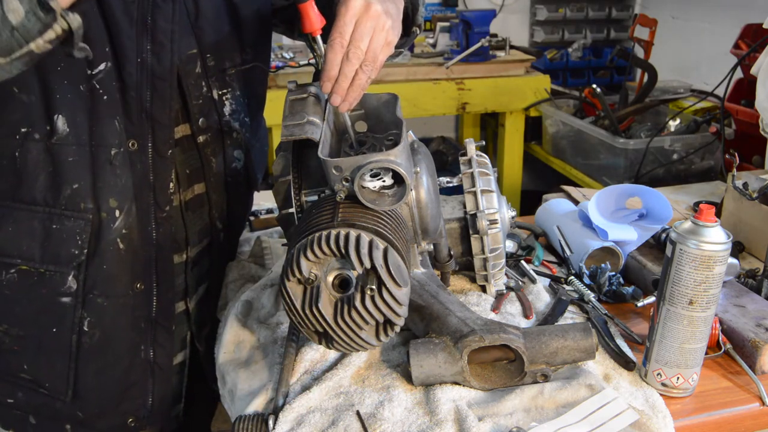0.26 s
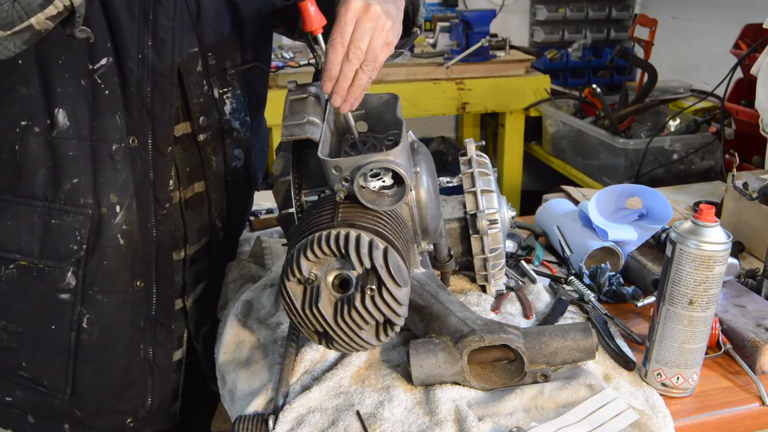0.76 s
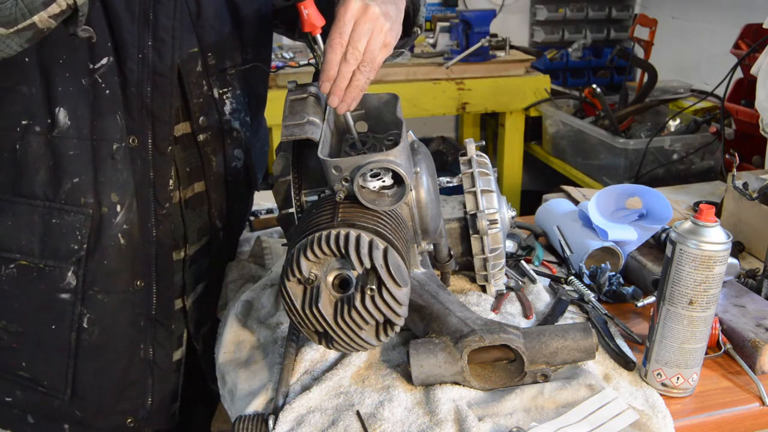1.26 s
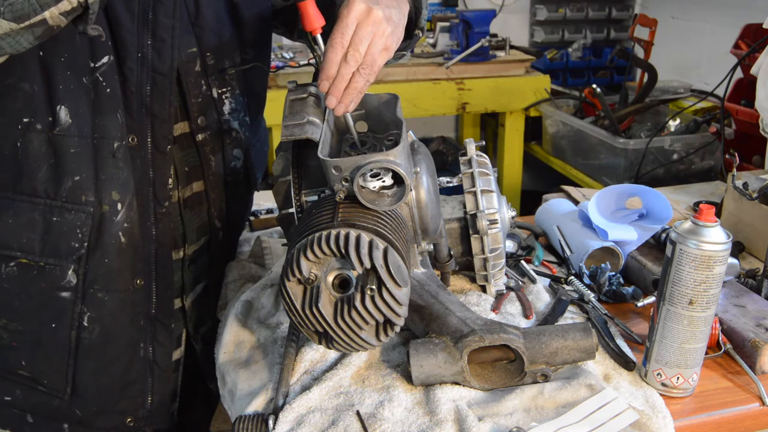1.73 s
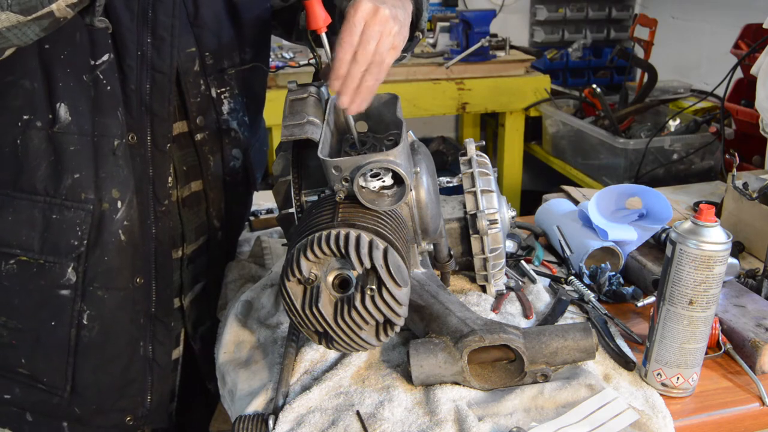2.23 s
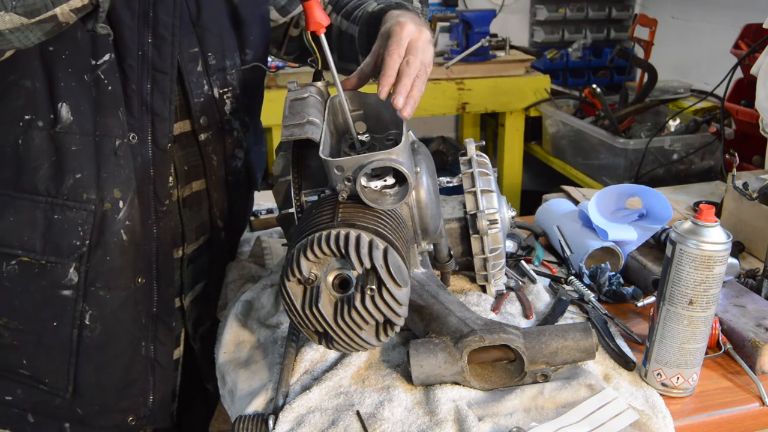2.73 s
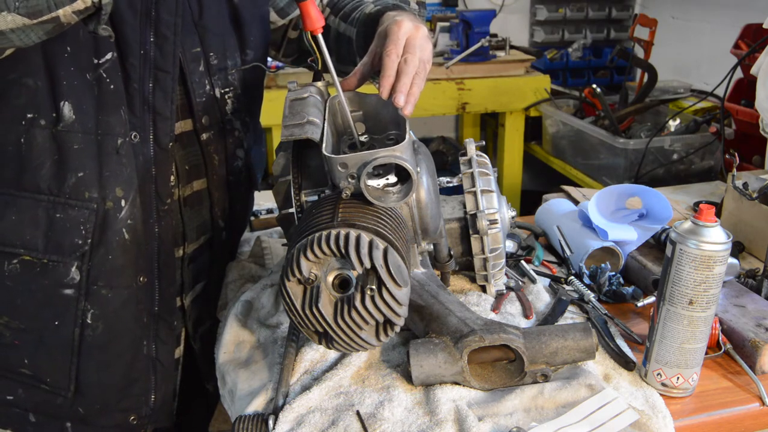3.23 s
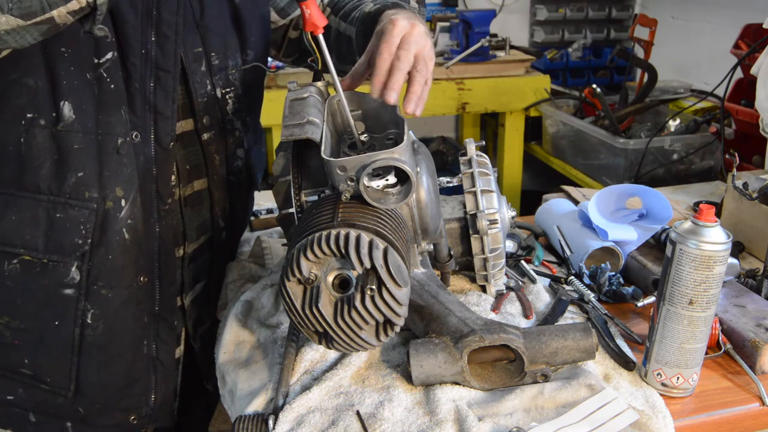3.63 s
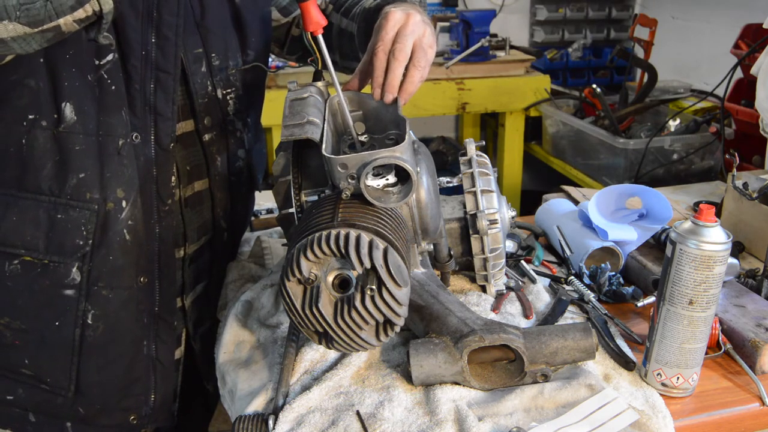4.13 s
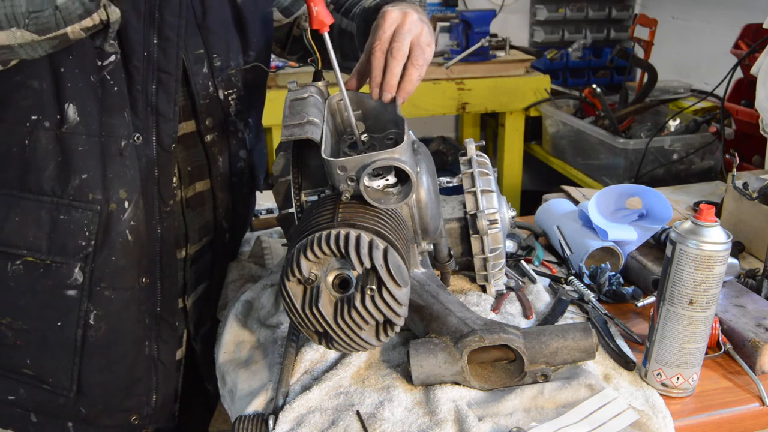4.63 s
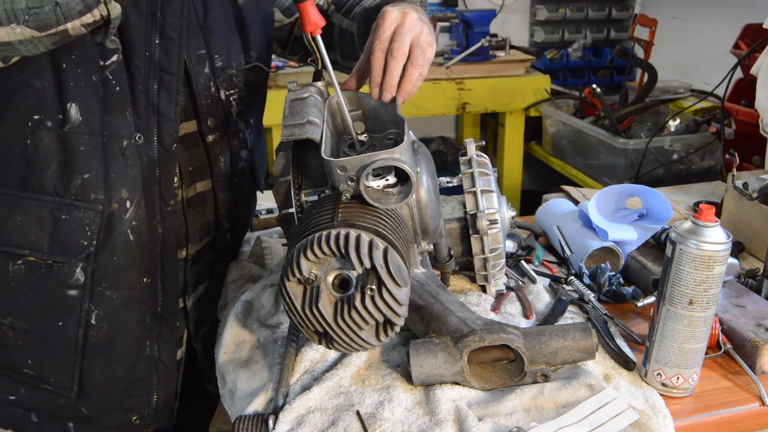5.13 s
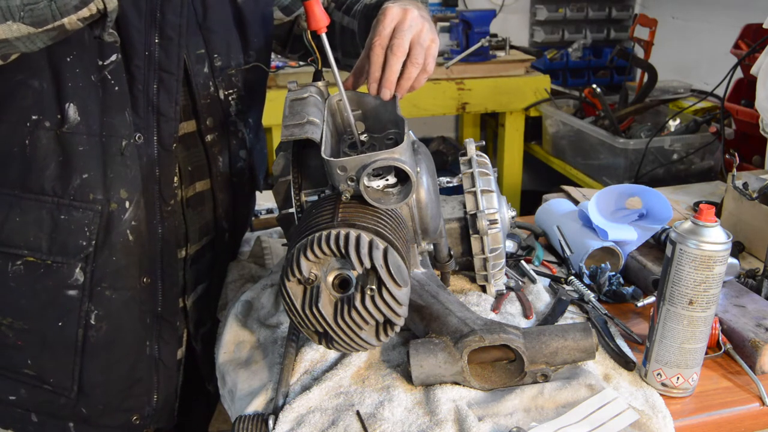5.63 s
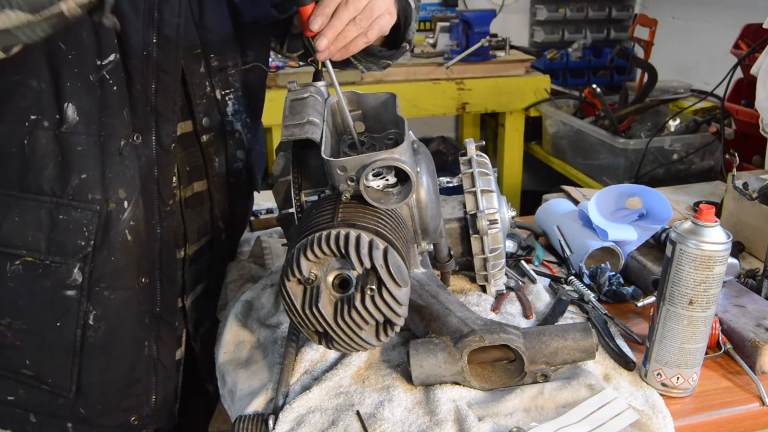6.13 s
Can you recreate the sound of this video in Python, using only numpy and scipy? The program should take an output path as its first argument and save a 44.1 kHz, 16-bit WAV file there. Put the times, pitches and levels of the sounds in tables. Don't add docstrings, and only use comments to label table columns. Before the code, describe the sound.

In a quiet workshop, a screwdriver ticks and squeaks faintly in a small metal engine casing, with one loud ringing clank midway over soft hiss.

```python
import sys
import numpy as np
from scipy import signal
from scipy.fft import rfft, irfft, next_fast_len
from scipy.io import wavfile
from scipy.ndimage import uniform_filter1d, map_coordinates

SR = 44100
rng = np.random.default_rng(int(sys.argv[2]) if len(sys.argv) > 2 else 0)


def store_pcm(level_fs):
    pcm = np.round(np.clip(level_fs, -1, 1) * 32767).astype(np.int16)
    wavfile.write(sys.argv[1], SR, np.atleast_2d(pcm).T)


def boost(x):
    u = np.asarray(x, float) / 20
    return 10 ** u


N = 280917


def add(out, s, sound):
    i = int(s * SR)
    out[i:i + len(sound)] += sound[:N - i]


def strike(table, modes, minor_db, count):
    out = np.zeros(N)
    strong = np.transpose(modes)
    lowest, highest = np.log(strong[0, 1]), np.log(strong[0, -2])
    minor_hz = np.exp(rng.uniform(lowest, highest, size=count))
    minor_level = minor_db + 3 * rng.standard_normal(size=count)
    minor_t60 = 0.19 * rng.uniform(0.45, 0.46, size=count)
    hz, db, t60 = np.hstack([strong, [minor_hz, minor_level, minor_t60]])[:, :, None]
    rattle, rattle_hz, crack_t60_s = .45, 105, .019
    for s, peak_db, centre_hz, octaves, crack_db, held_s in table:
        t = np.arange(int(min(1.7 * held_s + .012, .25) * SR)) / SR
        detune = 1 + .002 * rng.standard_normal(hz.shape)
        start = rng.uniform(0, 2 * np.pi, hz.shape)
        reach = boost(db) * np.exp(-.5 * (np.log2(hz / centre_hz) / octaves) ** 2)
        loose = rng.standard_normal((2, len(hz), 64))
        push = [np.array([np.interp(t * rattle_hz, np.arange(64), row) for row in part]) for part in loose]
        ring = boost(-60 * t / t60 - 6 * (t / held_s) ** 4)
        ring = ring * (1 + rattle * (push[0] + 1j * push[1]))
        crack = boost(crack_db - 60 * t / crack_t60_s)
        swing = np.exp(1j * (2 * np.pi * hz * detune * t + start))
        blow = np.real(reach * (ring + crack) * swing).sum(axis=0)
        blow = blow * np.sin(np.pi / 2 * np.minimum(t / 0.0017, 1)) ** 2
        add(out, s, boost(peak_db) * blow / np.abs(blow).max())
    return out


def blows(table, crack_db, crack_per_db):
    return [(s, db, hz, octaves, crack_db + crack_per_db * (db + 20), held_s)
            for s, db, hz, octaves, held_s in table]


# mode in Hz, level in dB, t60 in seconds.
RIM_MODES = [(179.2, -11, 0.16), (398, -20, 0.011), (630, -17.5, 0.035), (780, -8, 0.096), (883, -10, 0.29),
             (1020, -17.5, 0.97), (1142, -11, 0.97), (1308, -4, 0.46), (1430, -10.5, 0.16),
             (1590, -19.5, 0.53), (1667, -7.5, 0.14), (1950, -9, 0.087), (2076, -6.5, 0.506),
             (2210, -7.5, .15), (2050, -8.5, 0.061), (2467, -1, 0.054), (2490, -10.5, 0.31),
             (3315, -2.5, 0.052), (3900, -17.5, 0.49), (3700, -12, 0.19), (3940, -20, 0.201),
             (4190, -4, 0.073), (4600, -24, 0.098), (4780, -20, 0.35), (5300, -32, 0.64), (6290, -48, .1),
             (6900, -10, 0.064)]
# start in seconds, peak in dB, centre in Hz, width in octaves, seconds until the hand damps it.
RIM_KNOCKS = [
    (2.493, -13, 2700, 0.86, .11),
    (2.502, -34, 5130, 0.12, 0.067),
    (2.511, -28.5, 2076, .08, 0.1),
    (2.512, -23, 650, .6, .08),
]


def rim_knocks():
    return strike(blows(RIM_KNOCKS, 10.9, .01), RIM_MODES, minor_db=-21, count=70)


# mode in Hz, level in dB, t60 in seconds.
BORE_MODES = [(610, 4.5, 0.42), (870, -6, 0.32), (1014, -5, 0.72), (1125, 10, 0.41), (1260, 3.5, 0.71),
              (1700, -20, 0.095), (1734, 10, 0.29), (2250, 13.5, 0.042), (2343, 4, 0.11), (2230, -28, .4),
              (2590, -3, 0.097), (2690, -2.5, 0.046), (3360, -47, 0.14), (4010, -10, 0.12),
              (5000, -18, .04), (6000, -20, .03)]
# start in seconds, peak in dB, centre in Hz, width in octaves, seconds until the hand damps it.
BORE_KNOCKS = [
    (3.473, -20, 2400, 1, .014),
    (3.482, -30, 1760, .5, .008),
    (3.495, -47, 1600, .7, .09),
    (3.515, -40, 1200, .5, .05),
]


def bore_knocks():
    return strike(blows(BORE_KNOCKS, 11, .6), BORE_MODES, minor_db=-22, count=30)


# mode in Hz, level in dB, t60 in seconds.
SHANK_MODES = [(1057, -2.5, 0.39), (1376, 4, 0.11), (1577, -9.5, 0.33), (1790, 0, 0.073), (2020, -8, 0.11),
               (2394, 11.5, 0.082), (2470, -40, 0.24), (3325, 0, 0.051), (3560, -12, 0.04),
               (5000, -25, 0.026)]
# start in seconds, peak in dB, centre in Hz, width in octaves, crack over ring in dB.
SHANK_KNOCKS = [
    (.245, -29, 2160, 3.5, -18),
    (0.665, -29, 2600, 0.61, 19),
    (0.675, -47, 1710, 0.14, -6),
    (.912, -30.5, 2240, 1.8, -1),
]


def shank_knocks():
    return strike([(*row, .028) for row in SHANK_KNOCKS], SHANK_MODES, minor_db=-10, count=12)


# mode in Hz, level in dB, t60 in seconds.
SLOT_MODES = [(877, 18, 0.38), (1230, 8, 0.27), (1577, -3.5, 0.58), (1730, 4.5, 0.089), (2078, -3.5, 0.21),
              (2370, 0.5, .05), (3000, -9, 0.047), (3200, 0.5, 0.042), (3564, 5.5, 0.03),
              (4170, -2.5, 0.095), (5080, 7, 0.013), (5300, -9, 0.076), (5650, -10, 0.011),
              (6720, 4, 0.014), (7210, -4, 0.019), (7580, -5, 0.035), (8470, -4.5, 0.02),
              (9120, -15, 0.044), (10270, -23, 0.057), (11400, -6, 0.022)]
# start in seconds, peak in dB, centre in Hz, width in octaves.
TICKS = [(.213, -43, 1830, 0.33), (0.727, -52, 4130, 0.099), (2.754, -59, 1800, .34),
         (2.956, -54, 1730, 0.2), (2.957, -50.5, 6000, 1), (3.097, -58, 1500, .5), (3.183, -51, 2300, 0.5),
         (3.366, -48.5, 7350, 0.21), (3.366, -48, 3840, 0.85), (3.376, -47.5, 3030, 0.23),
         (3.694, -47.5, 7200, .14), (3.695, -47.5, 3450, 0.35), (3.75, -48.5, 1810, 0.44),
         (3.796, -41, 9000, .2), (3.8, -48.5, 2700, 0.67), (3.909, -51, 3060, 0.81),
         (3.985, -50.5, 5000, 1), (4.262, -49, 5080, 0.19), (4.265, -55.5, 2470, 0.57),
         (4.442, -52.5, 2250, .15), (4.808, -49, 6900, 0.08), (4.811, -45, 4130, 1),
         (5.12, -61, 2380, 0.28), (5.387, -54, 1730, 0.33), (5.411, -46, 9800, .18),
         (5.411, -39.5, 1740, 0.29), (5.425, -41, 1890, 0.19), (5.68, -44, 7400, 0.18),
         (6.34, -57, 1840, 0.59)]
# start in seconds, peak in dB, mode in Hz, seconds until damped.
PINGS = [(.215, -44.5, 1577, .041), (.216, -46, 2078, 0.037), (0.577, -53, 7700, 0.034),
         (0.91, -47.5, 5000, .015), (3.19, -54, 4170, .026), (3.694, -42, 5040, 0.052),
         (3.765, -56, 5650, .03), (3.796, -43.5, 5650, 0.024), (3.86, -65, 4170, .06),
         (4.878, -62, 6720, 0.018), (5.385, -44.5, 5080, 0.042), (5.386, -58, 7260, .02),
         (5.414, -56, 7580, .03), (5.411, -54, 3000, .015), (5.447, -56, 1577, .15),
         (5.68, -50, 4870, 0.033), (5.733, -60, 5080, 0.025)]


def slot_ticks():
    touches = [(*row, 12, .04) for row in TICKS]
    touches += [(s, db, hz, .055, 1.5, held_s) for s, db, hz, held_s in PINGS]
    return strike(touches, SLOT_MODES, minor_db=-16, count=10)


def unit(x):
    return x / np.sqrt(np.mean(np.abs(x) ** 2))


def stick_slip(table, wobble, attack, hold, release_db):
    out = np.zeros(N)
    for s, length_s, first_hz, last_hz, top_db in table:
        share = np.linspace(0, 1, int(length_s * SR))
        hz = first_hz + (last_hz - first_hz) * share ** .6
        db = top_db + np.interp(share, [0, attack, min(attack + hold, .95), 1], [-14, 0, 0, release_db])
        pace = np.cumsum(np.clip(wobble * hz, 5, 2000)) / SR
        chance = rng.standard_normal((2, 600))
        strength, turn = [map_coordinates(row, [pace], order=3) for row in chance]
        grip = 0.67 + strength + 1j * turn
        tone = unit(np.real(grip * np.exp(2j * np.pi * np.cumsum(hz) / SR)))
        add(out, max(s, 0), boost(db) * tone * signal.windows.tukey(len(share), .15))
    return out


# start and length in seconds, first and last pitch in Hz, top level in dB.
WHISTLES = [
    (0, .17, 7700, 6880, -75.5),
    (.25, .14, 8030, 8040, -78.5),
    (.34, .11, 8550, 8350, -79),
    (.73, 0.179, 4010, 3880, -77),
    (2.405, 0.038, 2100, 2030, -73.5),
    (2.39, 0.045, 4230, 3980, -71),
    (2.39, 0.046, 6050, 6100, -69.5),
]
SQUEALS = [
    (.922, 0.16, 4656, 4540, -48.5),
    (4.29, .06, 1730, 1700, -65.5),
    (5.412, 0.03, 4000, 4250, -55.5),
]
RUBS = [
    (.552, 0.057, 3080, 3700, -61),
    (.578, .15, 4260, 4150, -53),
    (.635, .085, 4780, 4620, -61.5),
    (4.83, 0.066, 1186, 1245, -62.5),
    (4.835, 0.049, 1645, 1670, -66),
]
SCRAPES = [
    (.908, 0.13, 3460, 4100, -58),
    (4.57, .11, 2490, 2600, -74),
    (4.812, 0.097, 5100, 4750, -70),
    (5.408, 0.053, 5300, 5100, -58.5),
]


def thread_squeaks():
    whistles = stick_slip(WHISTLES, wobble=.014, attack=0.073, hold=0.9, release_db=-7)
    squeals = stick_slip(SQUEALS, wobble=.055, attack=0.27, hold=0.15, release_db=-12)
    rubs = stick_slip(RUBS, wobble=.13, attack=0.075, hold=0.36, release_db=-9)
    scrapes = stick_slip(SCRAPES, wobble=.2, attack=0.024, hold=0.035, release_db=-12)
    return whistles + squeals + rubs + scrapes


def colour(points, x):
    hz, db = np.transpose(points)
    size = next_fast_len(len(x), real=True)
    bins = np.maximum(np.arange(size // 2 + 1) * SR / size, 1)
    gain = boost(np.interp(np.log(bins), np.log(hz), db))
    return irfft(rfft(x, size) * gain, size)[:len(x)]


def room(x, db):
    t60_s, gap_s = 0.22, 0.0019
    t = np.arange(SR // 2) / SR
    tail = rng.standard_normal(len(t)) * boost(-60 * t / t60_s) * (t > gap_s)
    tail = colour([(100, -10), (600, 0), (5000, -3), (16000, -14)], tail)
    return boost(db) * signal.fftconvolve(x, tail / np.sqrt(np.sum(tail ** 2)))[:N]


def opening(bench):
    threshold_db, open_per_s, top_db, close_s, lead_s = -71.5, 5.02, 11, 0.77, 0.021
    hop = SR // 100
    power = uniform_filter1d(bench ** 2, hop)[::hop]
    over = np.maximum(10 * np.log10(np.maximum(power, 1e-12)) - threshold_db, 0)
    lift = [4.5]
    for excess_db in over[:-1]:
        rate = open_per_s * excess_db * (1 - lift[-1] / top_db) - lift[-1] / close_s
        lift.append(np.clip(lift[-1] + rate / 100, 0, top_db))
    return np.interp(np.arange(N) / SR + lead_s, np.arange(len(lift)) * hop / SR, lift)


def walk(rate, count=N):
    k = max(int(SR / rate), 1)
    steps = np.repeat(rng.standard_normal(count // k + 1), k)
    return 1.3 * uniform_filter1d(uniform_filter1d(steps, k), k)[:count]


# frequency in Hz, density in dB per Hz.
RUMBLE = [(25, -38), (45, -15.5), (62, 0), (85, -12), (125, -2.5), (200, -0.5), (350, -2.5), (600, -2.5),
          (1000, -6.5), (1500, -23), (2500, -32)]
# frequency in Hz, density in dB per Hz.
HISS = [(1000, 3.5), (1600, 1.5), (3000, -1), (6000, -4.5), (10000, -8), (13000, -12), (15700, -14)]
# frequency in Hz, side minus mid in dB.
SIDE_SHARE = [(30, -28), (250, -8.5), (700, -11), (1200, -21.5), (2500, -11.5), (5000, -13.5),
              (10000, -8.5), (15000, -8)]
# frequency in Hz, level in dB.
HUM = [(59.7, -99), (119.4, -78), (178, -81), (240, -86.5)]


def floor(open_db):
    rumble_db, hiss_db = -76 + open_db, -77.5 + open_db
    t = np.arange(N) / SR
    low = 0
    for hz in 30 * 2 ** np.arange(0, 7, .5):
        edges = [(hz / 1.42, -40), (hz / 1.19, -3), (hz / 1.1, 0),
                 (hz * 1.1, 0), (hz * 1.19, -3), (hz * 1.42, -40)]
        band = colour(edges, rng.standard_normal(N))
        low = low + band * boost(1.2 * walk(3.26) + 1.06 * walk(8.1))
    hum = sum(boost(db + 71 + 0.5 * walk(4.6)) * np.sin(2 * np.pi * hz * t) for hz, db in HUM)
    layers = [(RUMBLE + [(5000, -77)], low, rumble_db + 2.0),
              ([(500, -8.5)] + HISS, rng.standard_normal(N), hiss_db + 3.5)]
    mid, side = hum * boost(rumble_db), 0
    for points, noise, db in layers:
        shaped = colour(points, noise)
        gain = boost(db) / np.std(shaped)
        mid = mid + gain * shaped
        spread = colour(SIDE_SHARE, colour(points, rng.standard_normal(N)))
        side = side + gain * spread * np.std(noise) * boost(3.7 * walk(6.6))
    return mid, side


def scene():
    bench = rim_knocks() + bore_knocks() + shank_knocks() + slot_ticks() + thread_squeaks()
    no_bass = signal.butter(N=3, Wn=150, btype="high", fs=SR, output="sos")
    bench = signal.sosfilt(no_bass, bench)
    mid, side = floor(opening(bench))
    mid = mid + bench + room(bench, db=-13.5)
    side = side + room(bench, db=-33)
    return np.array([mid + side, mid - side])


def top_cut(x):
    return signal.sosfilt(signal.butter(12, 15820, fs=SR, output="sos"), x)


def record(dry):
    top = signal.ellip(N=8, rp=.2, rs=60, Wn=15700, fs=SR, output="sos")
    mix = signal.sosfilt(top, dry)
    return top_cut(mix)


dry = scene()
out = record(dry)
store_pcm(out)
```